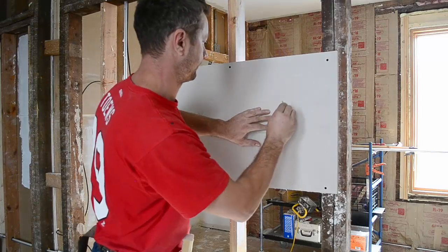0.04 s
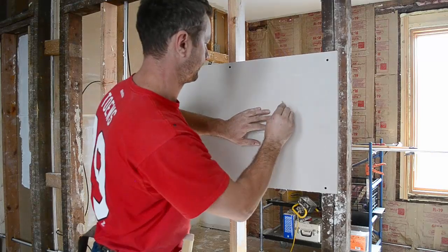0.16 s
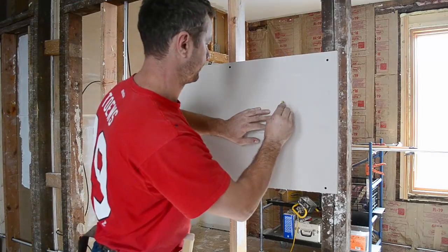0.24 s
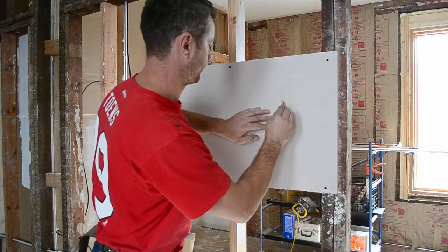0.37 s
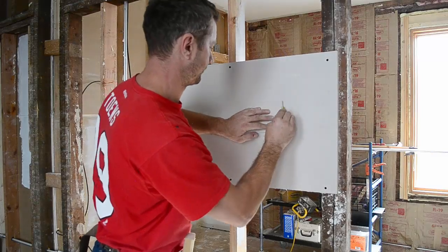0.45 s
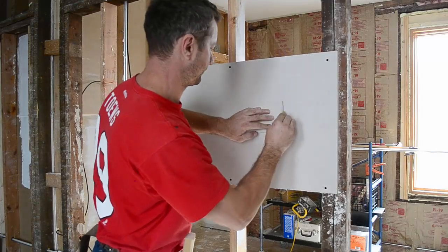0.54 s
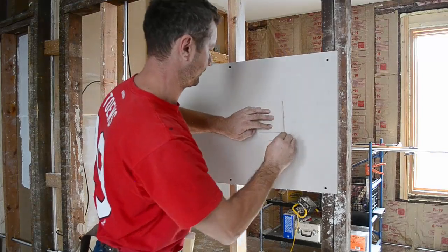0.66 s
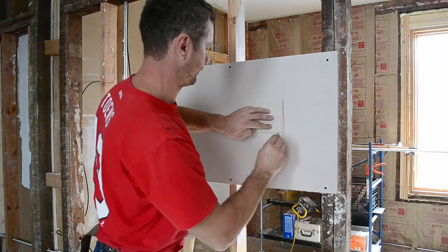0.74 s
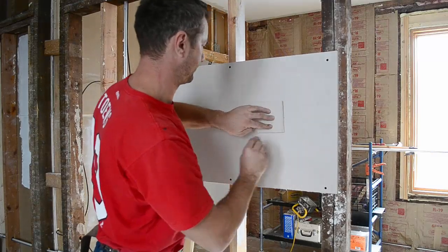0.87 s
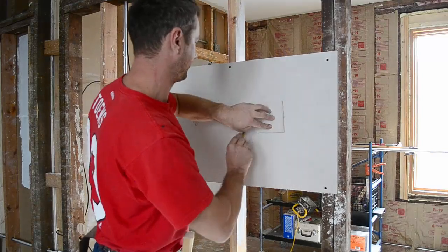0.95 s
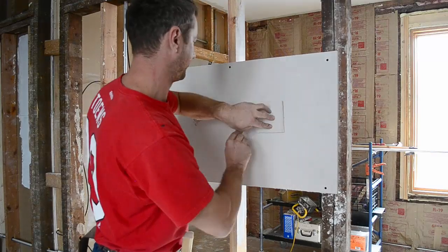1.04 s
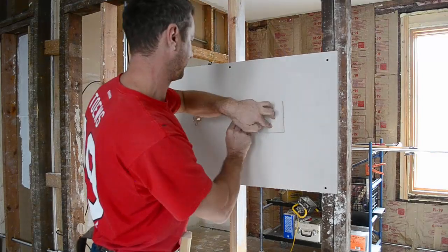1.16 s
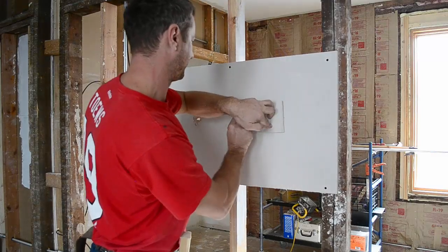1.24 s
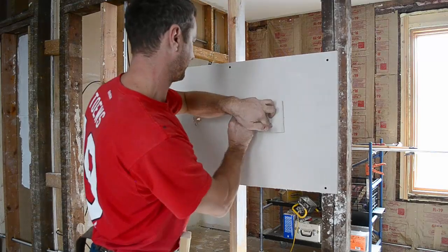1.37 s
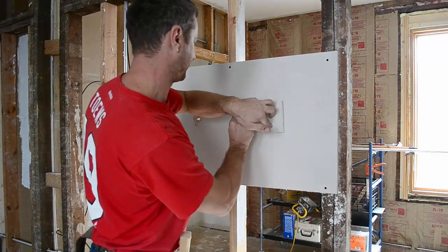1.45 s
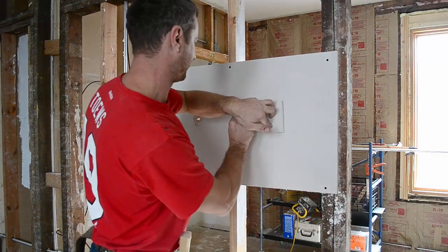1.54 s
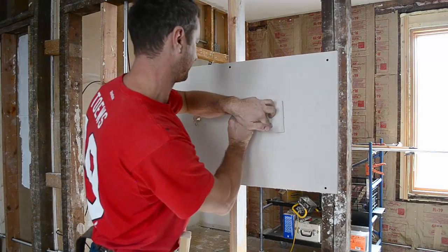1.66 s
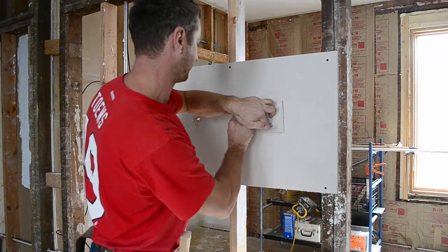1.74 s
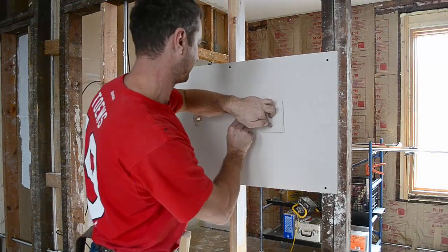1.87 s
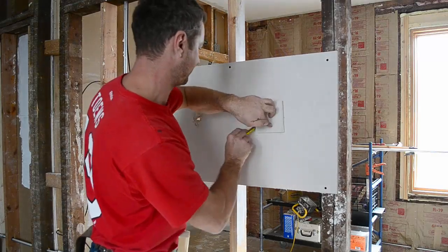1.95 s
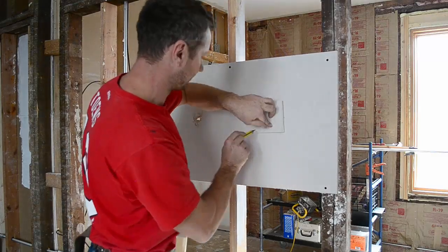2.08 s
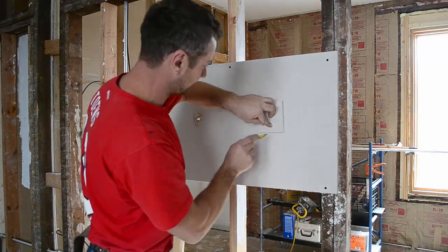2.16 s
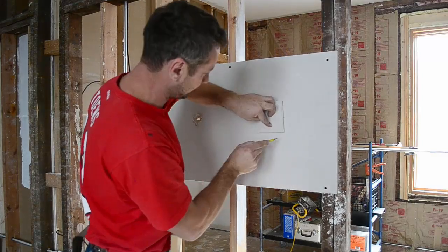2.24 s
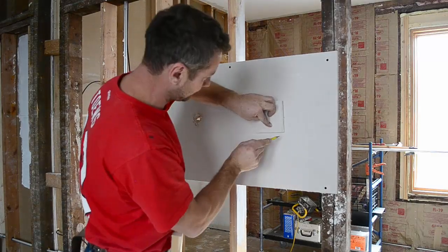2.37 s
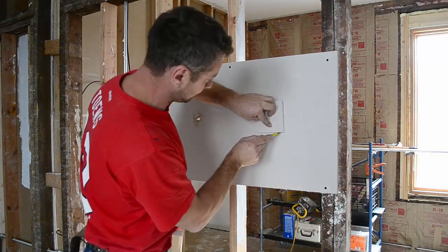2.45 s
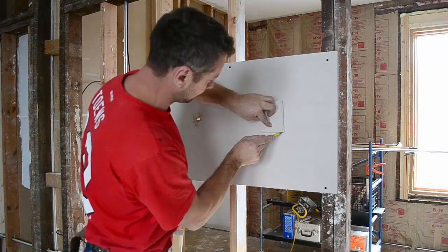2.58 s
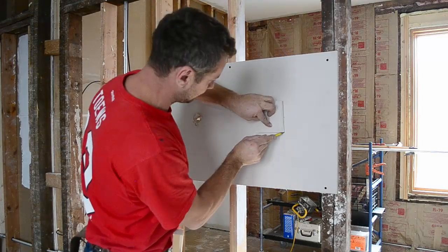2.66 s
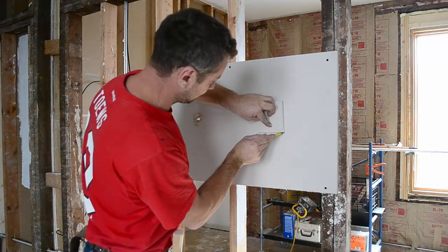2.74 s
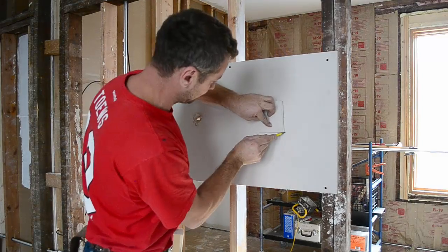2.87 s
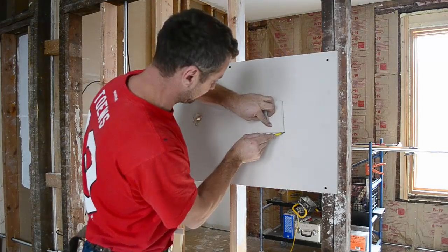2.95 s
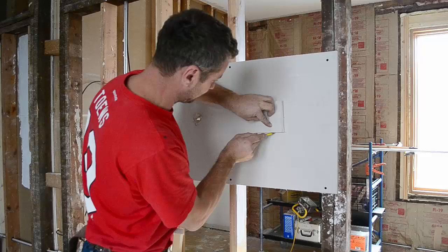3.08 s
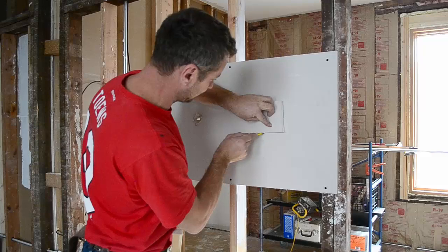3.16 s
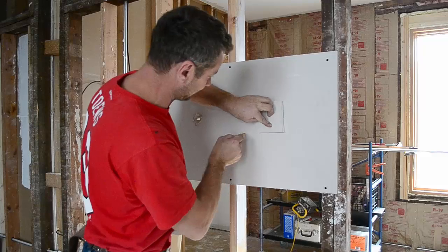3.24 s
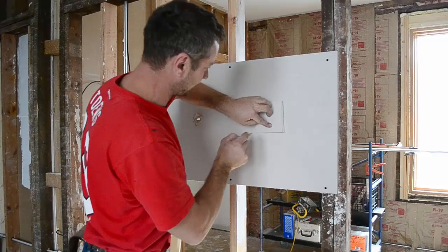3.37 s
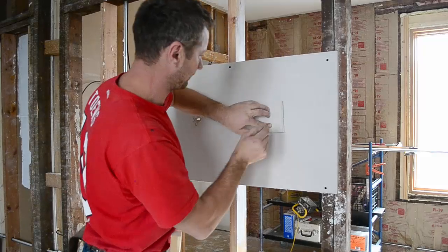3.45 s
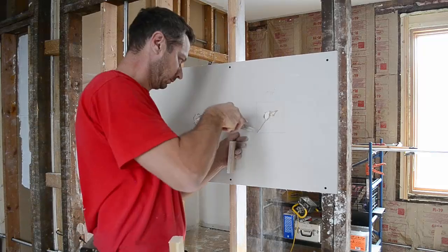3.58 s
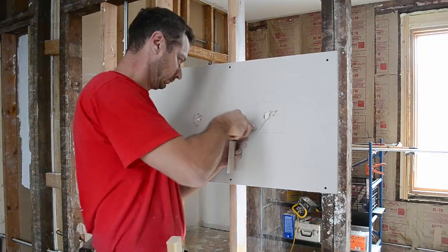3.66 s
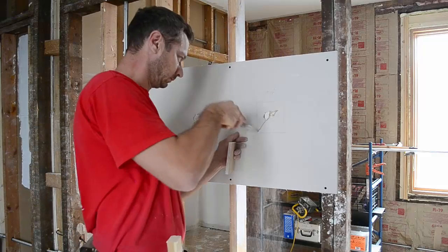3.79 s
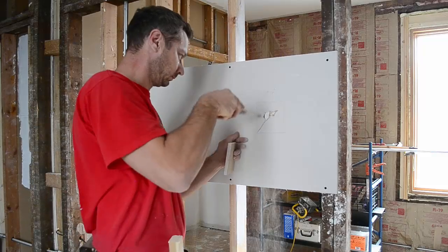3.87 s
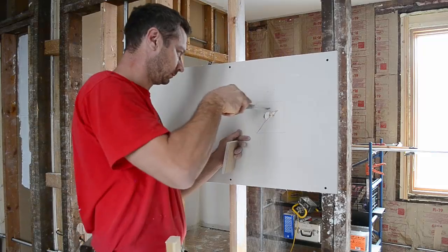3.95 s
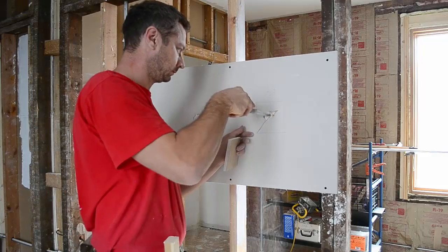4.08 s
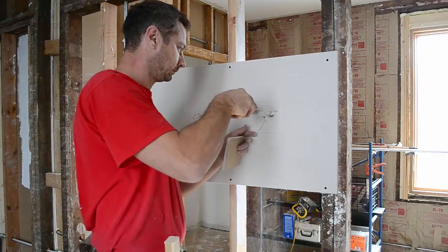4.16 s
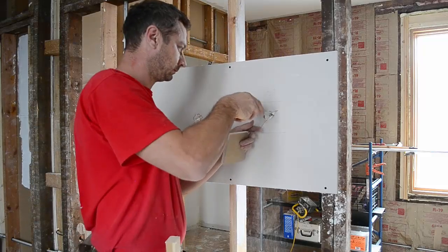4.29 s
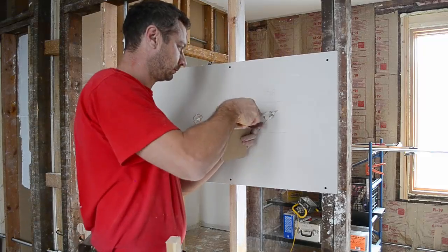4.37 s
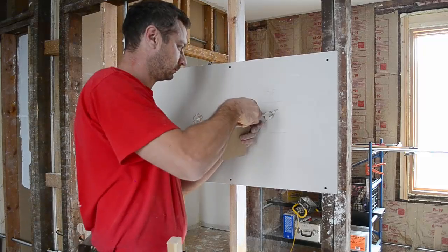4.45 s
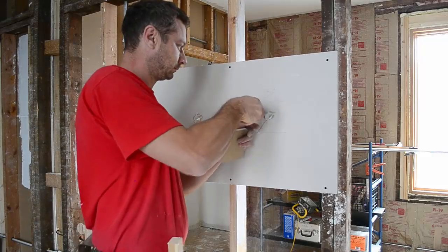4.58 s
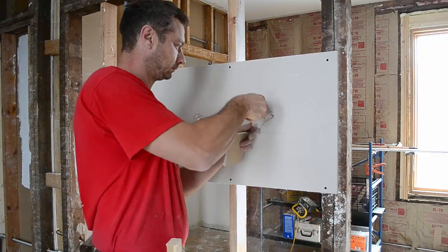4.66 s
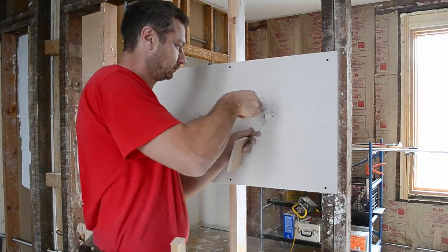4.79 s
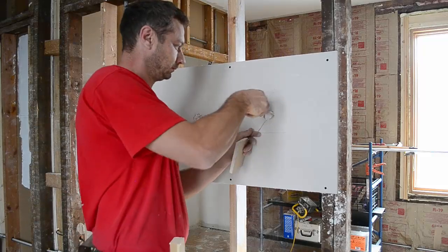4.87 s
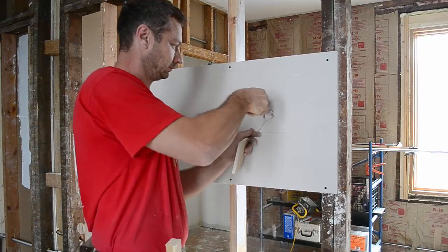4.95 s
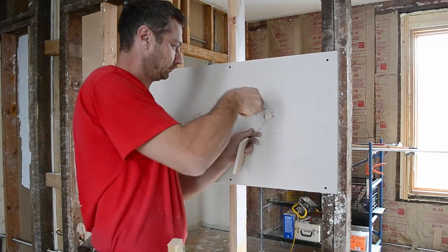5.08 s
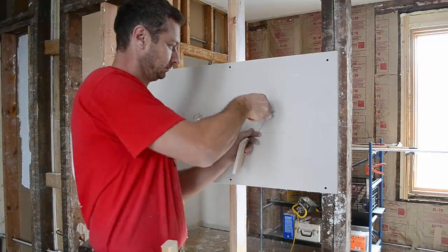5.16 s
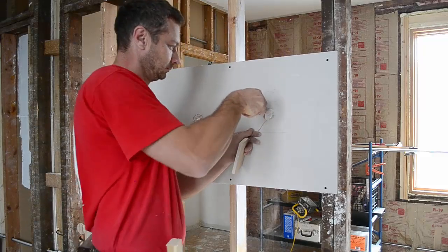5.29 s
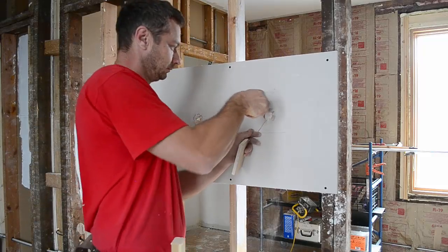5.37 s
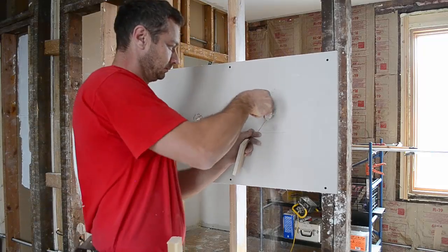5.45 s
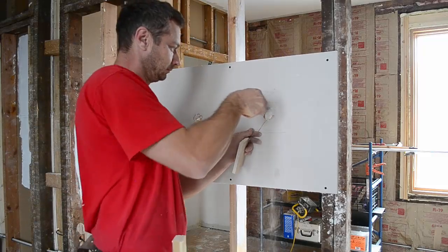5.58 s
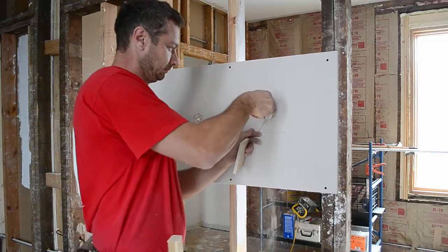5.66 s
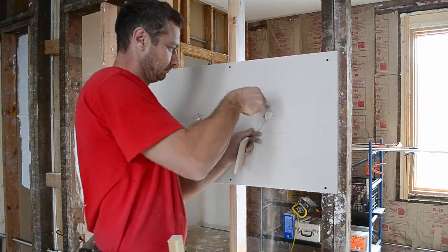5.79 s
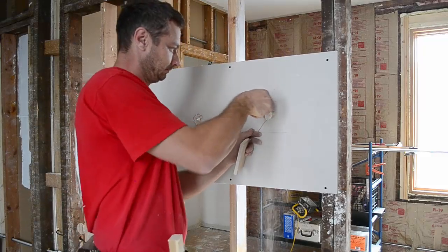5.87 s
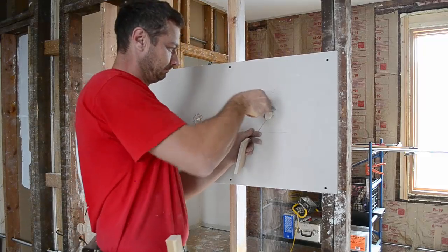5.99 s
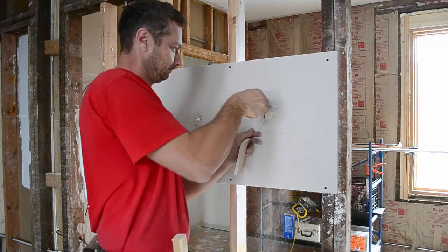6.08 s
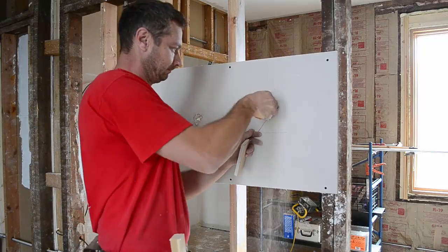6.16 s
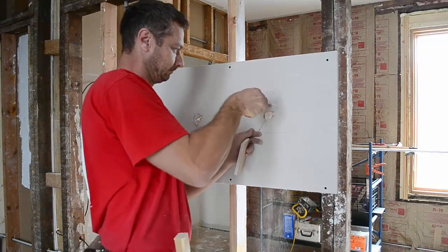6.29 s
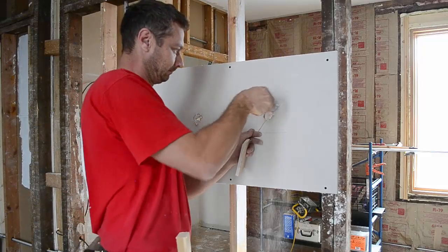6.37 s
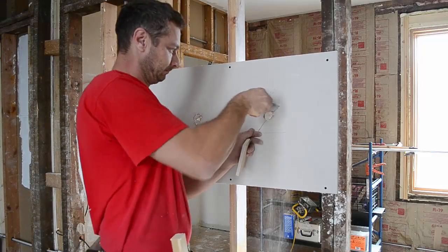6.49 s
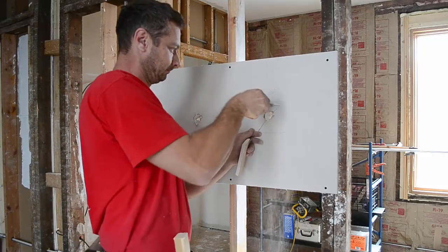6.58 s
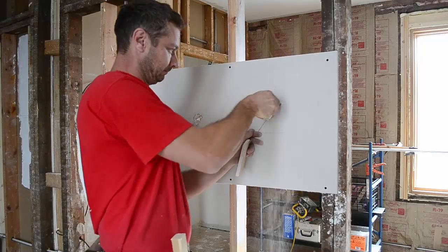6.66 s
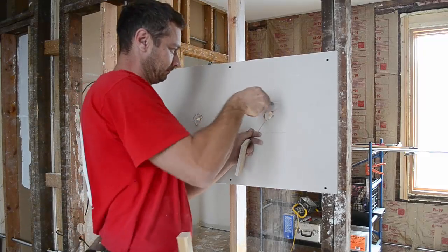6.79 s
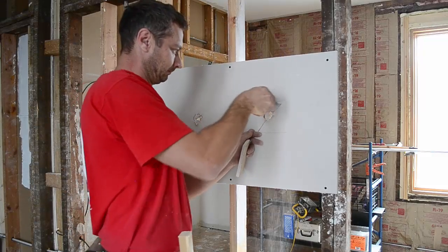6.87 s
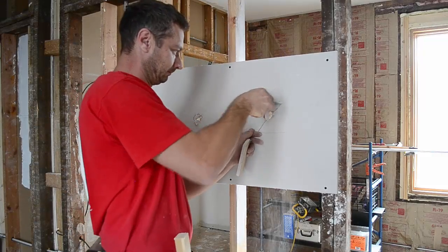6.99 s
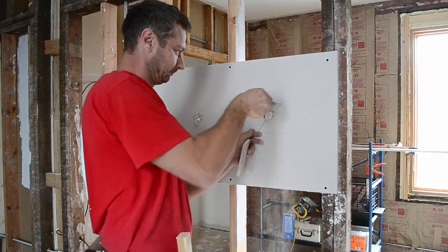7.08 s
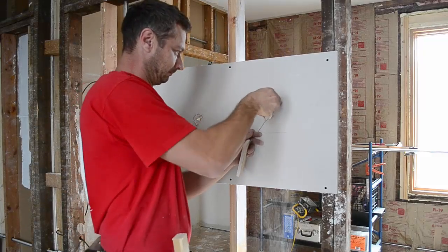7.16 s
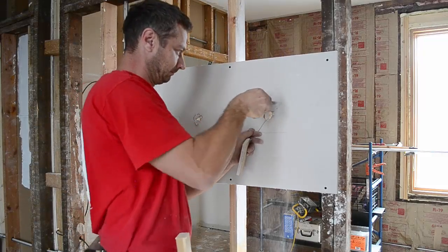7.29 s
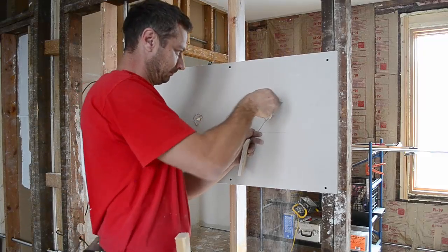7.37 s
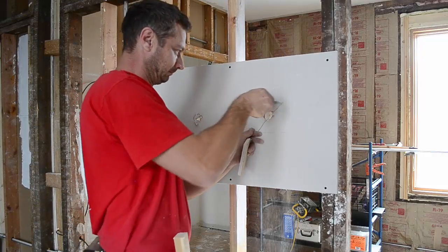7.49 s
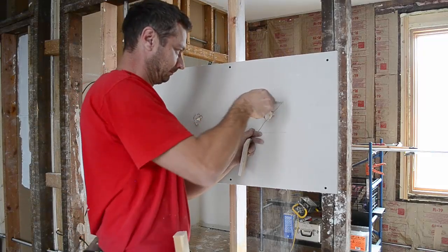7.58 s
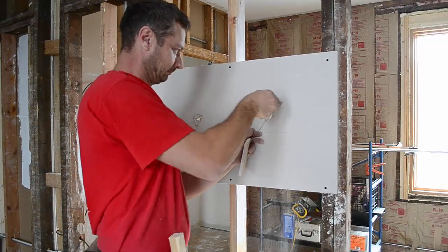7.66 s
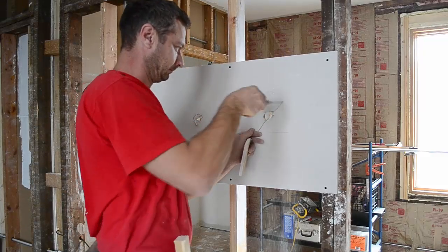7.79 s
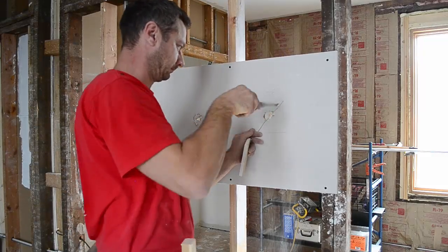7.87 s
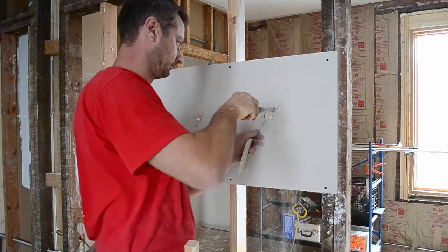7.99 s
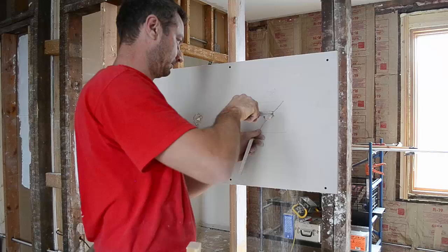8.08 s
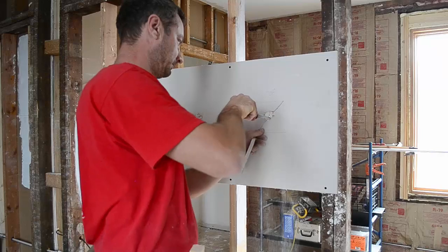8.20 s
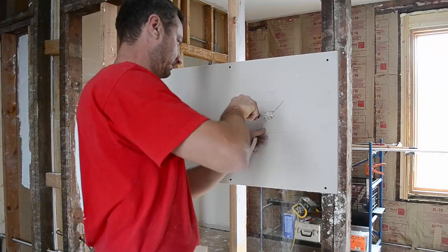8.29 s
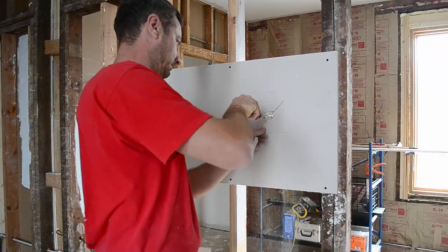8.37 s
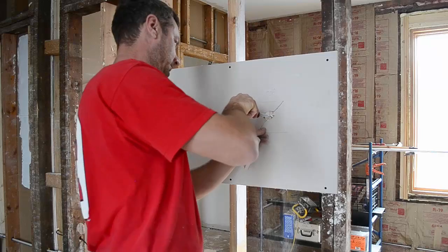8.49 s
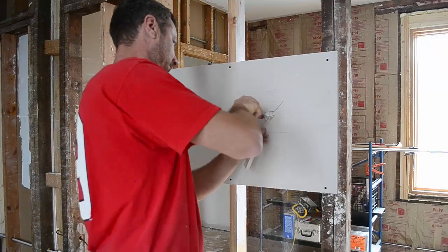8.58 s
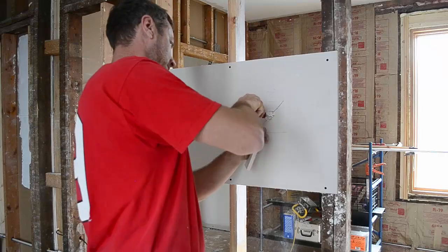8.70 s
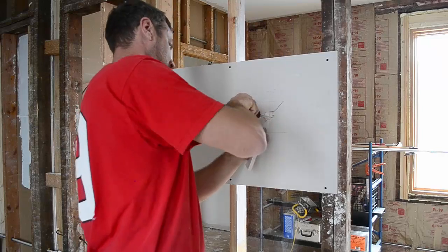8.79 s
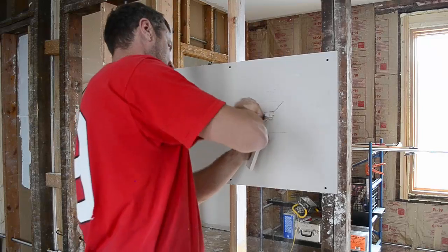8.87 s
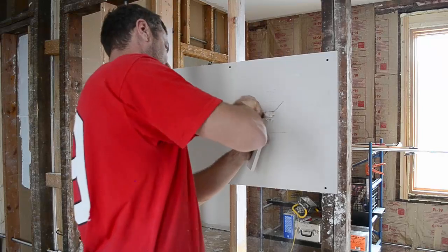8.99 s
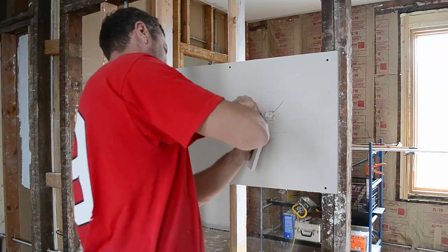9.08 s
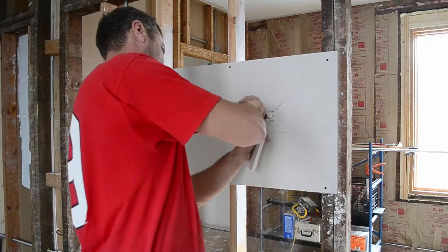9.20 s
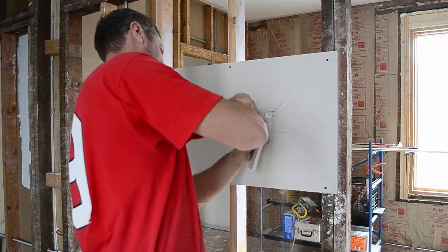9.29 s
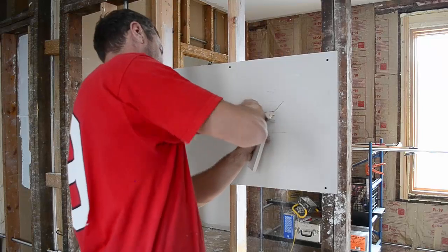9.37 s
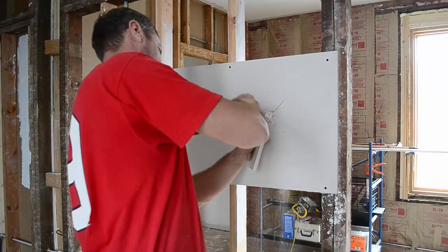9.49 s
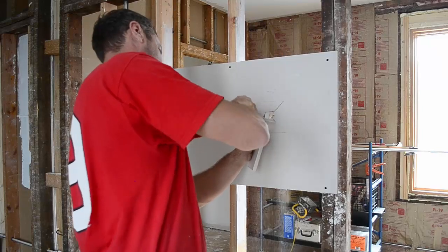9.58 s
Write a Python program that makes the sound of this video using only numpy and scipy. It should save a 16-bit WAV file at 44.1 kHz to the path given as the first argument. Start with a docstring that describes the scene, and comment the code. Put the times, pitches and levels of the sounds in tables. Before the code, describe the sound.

In a quiet, bare room, a pencil draws a few faint scratchy lines on drywall, with light knocks and plastic ticks. A hand saw is jabbed hard through the sheet, scrapes and snags, then rasps in quick push-pull strokes, about four cycles a second, with hollow thudding and gritty crunch. It pauses, slides softly, then starts a second cut. Close microphone, short room ring.

```python
"""A jab saw is punched through drywall, rasps back and forth, is drawn out, and starts a second cut.
Its teeth shake the sheet and crush the gypsum core: jolts and grains through sheet and blade resonances.
Before that a pencil traces three sides of an outlet box: grain noise shaped by pressure.
Box, pencil and saw handle knock, tick and squeak. The empty room adds a short ring and faint air noise.
"""
import sys
import numpy as np
from scipy import signal
from scipy.fft import rfft, irfft
from scipy.io import wavfile
from scipy.ndimage import uniform_filter1d

SR = 44100
rng = np.random.default_rng(int(sys.argv[2]) if len(sys.argv) > 2 else 0)


def output_pcm(signal):
    """Save a mono or channel-first signal as 16-bit PCM at the path in sys.argv[1].

    Samples are clipped to [-1, 1] before scaling.
    """
    pcm = np.clip(np.atleast_2d(signal).T, -1, 1) * 32767
    wavfile.write(sys.argv[1], SR, np.round(pcm).astype(np.int16))


N = 425124
TIME_S = np.arange(N) / SR

# Table levels are relative: filters, mix gains and the room follow.
# faint air of the room: freq_hz, spectrum_db
AIR_SPECTRUM = [(15, -57.5), (25, -38.5), (96, -3), (410, -6.5), (478, -2), (4260, -17.5), (6730, -22.5),
                (7460, -26.5), (8050, -31), (9620, -27.5), (10900, -41), (14200, -34), (22000, -120)]
AIR_DB = -63.5
# ring of the room: freq_hz, t60_s
ROOM_DECAY = [(150, 0.54), (400, 0.23), (1000, 0.44), (2800, 0.44), (7300, 0.42)]

# sheet between its studs: freq_hz, width_hz, lift_db
BOARD_MODES = [(159.6, 24.6, 9), (214, 15, 5.5), (357, 37, 9.5), (534, 101, 7), (859, 48, 6.5),
               (1023, 25, 4), (1042, 41, 2), (1110, 20, 6.5), (1309.5, 30, 9), (1754, 25, 6),
               (2273, 110, 3.5)]
# steel blade: freq_hz, width_hz, lift_db
BLADE_MODES = [(1880, 39, 7.5), (2510, 430, 0.5), (2740, 90, 1.5), (2950, 100, 0)]
# plastic box: freq_hz, width_hz, lift_db
BOX_MODES = [(2046, 200, 13), (2290, 200, 13), (2950, 220, 8), (4950, 450, 8)]
# box pressed against the pencil: freq_hz, width_hz, lift_db
PENCIL_MODES = [(494, 45, 2), (870, 350, 5.5), (3060, 220, 3.5), (4900, 350, 6.5)]

# sheet shaken by the teeth: freq_hz, spectrum_db
THUD_SPECTRUM = [(25, -50.5), (62, -33.5), (95, -8), (150, -2), (300, 0.5), (480, -2.5), (650, -4.5),
                 (1000, -9.5), (2000, -31.5), (6000, -42.5)]
# teeth on the paper face: freq_hz, spectrum_db
RASP_SPECTRUM = [(100, -50.5), (400, -11), (750, 4), (1100, 0.5), (1500, -2.5), (2500, -11.5), (5000, -37),
                 (10000, -52)]
# crushed gypsum: freq_hz, spectrum_db
CRUNCH_SPECTRUM = [(100, -21.5), (600, -9), (1400, -4.5), (2000, 1.5), (3000, -0.5), (4000, -4.5),
                   (5000, -10.5), (6500, -15.5), (7400, -18), (7900, -24.5), (9000, -18), (10200, -30.5)]
# blade sliding over grit: freq_hz, spectrum_db
SCRAPE_SPECTRUM = [(20, -38), (100, -6), (250, -0.5), (700, 1), (1400, -1), (2400, 0), (4000, -2),
                   (6500, -9), (8000, -14), (9200, -12), (10500, -23)]
# pencil on paper: freq_hz, spectrum_db
GRAPHITE_SPECTRUM = [(60, -32), (150, -11), (350, -5.5), (600, -5.5), (1000, -4), (1500, -3.5),
                     (2200, -7.5), (3000, -10), (4200, -16.5), (5400, -14.5), (7800, -24), (9300, -22),
                     (10500, -34)]
# dull touch: freq_hz, spectrum_db
KNOCK_SPECTRUM = [(20, -45), (200, -3), (600, 5.5), (1100, -2), (2000, -11), (5000, -21), (10000, -45)]
# sharp touch: freq_hz, spectrum_db
TICK_SPECTRUM = [(20, -60), (200, -11), (1500, -5), (2100, -1), (4000, -6), (7000, -7), (10000, -20)]

# box, pencil and saw handle knocking on the board: start_s, level_db
KNOCKS = [(.159, -56), (.189, -47), (.273, -47), (.308, -49), (1.148, -56), (1.389, -51), (1.444, -46),
          (1.737, -47.5), (2.472, -49), (2.98, -44), (4.452, -34.5)]
# ticks and creaks of the box and the saw in the hand: start_s, level_db
TICKS = [(1.274, -43.5), (1.316, -57), (1.4, -54), (2.249, -59), (8.053, -54)]
KNOCK_DECAY_S, TICK_DECAY_S = 0.025, 0.021

# box or blade shifted: start_s, length_s, pitch_hz, overtone_hz, level_db
SQUEAKS = [(1.367, 0.054, 2850, 4700, -54.5), (2.292, .06, 3000, 6000, -64),
           (4.027, 0.066, 2550, 3650, -45.5), (8.032, .05, 2800, 4000, -49)]
SQUEAK_ATTACK_S, SQUEAK_RELEASE_S, SQUEAK_WIDTH_HZ, OVERTONE_DB = 0.03, 0.03, 500, -7.5

# pencil lines and short touches on the paper face: start_s, length_s, level_db, swell_db (start to end)
PENCIL_LINES = [(.4, .325, -36, 3.5), (1.605, 0.076, -48, -4), (1.74, 0.34, -34.5, 2.5),
                (2.475, 0.12, -44, -1), (2.715, 0.057, -48, 6), (2.83, 0.14, -49, 1),
                (2.98, 0.31, -32.5, 19)]
PENCIL_ATTACK_S, PENCIL_RELEASE_S = 0.044, 0.023

# blade sliding lightly in the slot: start_s, length_s, level_db, swell_db (start to end)
SLIDES = [(3.925, .08, -50.5, -9), (4.02, .13, -54.5, -8), (4.18, .14, -36.5, 6), (4.3, 0.31, -42, -3.5),
          (8.01, 0.21, -57.5, -4), (8.235, 0.086, -55, -3), (8.31, 0.17, -46, -7),
          (8.455, 0.098, -54.5, -1)]
SLIDE_ATTACK_S, SLIDE_RELEASE_S = 0.029, 0.023

# blade singing at a pitch set by how the slot holds it: start_s, end_s, pitch_hz, width_hz, gain_db
SINGING = [(4.15, 4.383, 3300, 165, 7.5), (8.5, 9.7, 3510, 80, 3.5)]

# push and pull, effort against a typical push: start_s, push_effort_db, pull_effort_db
STROKES = [(4.556, 0, -8.5), (4.815, 0.5, -5), (5.087, 2, -1.5), (5.338, -0.7, -3), (5.587, -0.5, -2.5),
           (5.833, 1, -2), (6.081, 0.5, -3), (6.343, -2.5, -3), (6.584, 1.5, -1.5), (6.838, -4, -4),
           (7.077, 0.6, -4), (7.322, -1.5, -5), (7.569, -3.5, -8), (8.558, -2.5, -8), (8.832, 0, -6.5),
           (9.083, 1, -5.5), (9.327, 2, -5.5), (9.578, 3, -10)]
# shove that drives the blade through, and its follow-through: start_s, length_s, effort_db
PLUNGE = [(3.609, .127, -1), (3.693, .148, -12.5)]
# saw tip jabbed into the board: start_s, effort_db, decay_s
JABS = [(3.537, -3.5, 0.068), (3.565, -4.5, 0.0078), (4.556, -18.5, .033), (8.538, -12.5, 0.036)]
# single teeth snagging as the blade is fed into the slot: start_s, level_db
SNAGS = [(4.183, -29), (4.257, -31), (4.278, -28), (4.292, -30), (4.345, -32), (4.381, -28), (4.49, -27.5)]
SNAG_DECAY_S = 0.0065
# slow drift of the contact levels along the cut: time_s, thud_db, rasp_db, crunch_db
DRIFT = [(3.6, 0.5, 0.5, -1.5), (4.6, .5, -1, 4), (5.3, .5, -4, 0.1), (6.1, .5, .5, 1.4), (7.3, 1, 1, -2),
         (8.55, -2, 3.5, 2.5), (8.8, 0.5, 1.5, -.5), (9.6, 0.5, 1.5, -1)]

# the pull starts at PULL_SHARE of a cycle; a cycle is capped at SLOWEST_S
PUSH_S, PULL_S, PULL_SHARE, SLOWEST_S = 0.146, 0.134, 0.552, 0.275
# contact levels on a typical push, and dB gained per dB of effort
THUD_DB, RASP_DB, CRUNCH_DB = -14.5, -20.5, -22
RASP_PER_EFFORT, CRUNCH_PER_EFFORT = 1, 0.67
# until the slot opens, pushed teeth bind: they shake the sheet but cut little
SLOT_OPEN_S, BIND_DB = 4.95, -11


def from_db(db):
    """Decibels to gain."""
    return 10 ** (np.asarray(db) / 20)


def unit(x):
    """Scales to rms 1."""
    return x / np.sqrt(np.mean(x ** 2) + 1e-20)


def read(points, hz):
    """Reads a table along a log-frequency axis."""
    table_hz, value = np.transpose(points)
    return np.interp(np.log(hz + 1), np.log(table_hz + 1), value)


def colour(x, spectrum, modes=(), size=8192):
    """Minimum-phase filter of energy 1: a broad spectrum lifted by ringing resonances."""
    hz = np.fft.rfftfreq(size, 1 / SR)
    db = read(spectrum, hz)
    for mode_hz, width_hz, lift_db in modes:
        db = db + lift_db / (1 + (2 * (hz - mode_hz) / width_hz) ** 2)
    # folding the cepstrum makes the response causal
    cepstrum = irfft(np.log(from_db(db)))
    cepstrum[1:size // 2] *= 2
    cepstrum[size // 2 + 1:] = 0
    ring = irfft(np.exp(rfft(cepstrum)))[:size // 2]
    return signal.oaconvolve(x, ring / np.linalg.norm(ring))[:N]


def grains(per_s, spread_db):
    """Tiny fractures at random moments, a few much larger than the rest; rms 1."""
    sizes = from_db(spread_db * np.minimum(rng.exponential(1, N), 4))
    signs = rng.choice([-1, 1], N)
    return unit(sizes * signs * (rng.random(N) < per_s / SR))


def flutter(per_s, depth_db):
    """Unevenness: a gain of rms 1 that wanders at the given rate."""
    knots = rng.standard_normal(N)
    return unit(from_db(depth_db * np.interp(TIME_S * per_s, np.arange(N), knots)))


def blow(start_s, level_db, decay_s):
    """Gain that jumps at a blow and dies away exponentially."""
    return from_db(level_db) * (TIME_S >= start_s) * np.exp(-abs(TIME_S - start_s) / decay_s)


def rubs(rows, attack_s, release_s):
    """Gain of rubbing moves: each sets in, swells or eases evenly in dB, and lifts off."""
    gain = np.zeros(N)
    for start_s, length_s, level_db, swell_db in rows:
        moving = (TIME_S > start_s) & (TIME_S < start_s + length_s)
        age_s = TIME_S[moving] - start_s
        touch = np.minimum(age_s / attack_s, 1) * np.minimum((length_s - age_s) / release_s, 1)
        gain[moving] += touch * from_db(level_db + swell_db * (age_s / length_s - 0.5))
    return gain


def contacts(rows, decay_s, click_db=14):
    """Each touch starts with a click and ends in a brief scuff."""
    scuff_gain = sum(blow(start_s, level_db, decay_s) for start_s, level_db in rows)
    force = scuff_gain * grains(5000, 2.7)
    for start_s, level_db in rows:
        force[int(start_s * SR)] += from_db(level_db + click_db)
    return force


def air():
    """Faint steady noise of the quiet room."""
    return from_db(AIR_DB) * colour(rng.standard_normal(N), AIR_SPECTRUM)


def room(x, tail_db=-4, early_db=-3, early_cut_hz=800, tail_cut_hz=260):
    """Direct sound, a few hard stud reflections, then a tail whose bands die at their own speeds."""
    tap_s = TIME_S[:SR * 3 // 4]
    signs = rng.choice([-1., 1.], len(tap_s))
    taps = signs * (rng.random(len(tap_s)) < 3000 / SR) * (tap_s > 0.008)
    hz, age_s, bands = signal.stft(taps, SR, nperseg=256)
    decay = from_db(-60 * age_s / read(ROOM_DECAY, hz)[:, None])
    tail = signal.istft(bands * decay, SR, nperseg=256)[1]
    early = np.zeros(len(tail))
    delays_s = rng.uniform(0.002, 0.014, size=8)
    early[(delays_s * SR).astype(int)] = rng.choice([-1., 1.], size=8)
    # narrow timbers throw back little bass, and the open walls let it escape
    early = signal.sosfilt(signal.butter(2, early_cut_hz, "high", fs=SR, output="sos"), early)
    tail = signal.sosfilt(signal.butter(1, tail_cut_hz, "high", fs=SR, output="sos"), tail)
    echo = from_db(tail_db) * tail / np.linalg.norm(tail)
    echo += from_db(early_db) * early / np.linalg.norm(early)
    echo[0] += 1  # direct sound
    return signal.oaconvolve(x, echo / np.linalg.norm(echo))[:N]


def handling():
    """Dull touches sound the board, sharp ones the box."""
    knocks = colour(contacts(KNOCKS, KNOCK_DECAY_S), KNOCK_SPECTRUM, BOARD_MODES)
    ticks = colour(contacts(TICKS, TICK_DECAY_S), TICK_SPECTRUM, BOX_MODES)
    return knocks + ticks


def squeak_band(slips, centre_hz):
    """Slip noise in one resonance, rms 1."""
    edges_hz = [centre_hz - SQUEAK_WIDTH_HZ / 2, centre_hz + SQUEAK_WIDTH_HZ / 2]
    return unit(signal.sosfilt(signal.butter(2, edges_hz, "band", fs=SR, output="sos"), slips))


def squeaks():
    """Quick uneven slips ring a resonance and its overtone."""
    slips = grains(3200, 4.7)
    out = np.zeros(N)
    for start_s, length_s, pitch_hz, overtone_hz, level_db in SQUEAKS:
        gain = rubs([(start_s, length_s, level_db, 0)], SQUEAK_ATTACK_S, SQUEAK_RELEASE_S)
        overtone = from_db(OVERTONE_DB) * squeak_band(slips, overtone_hz)
        out += gain * (squeak_band(slips, pitch_hz) + overtone)
    return out


def pencil():
    """Graphite skips over paper fibres, and the sheet radiates it."""
    pressure = rubs(PENCIL_LINES, PENCIL_ATTACK_S, PENCIL_RELEASE_S)
    skips = pressure * grains(7000, 3.2) * flutter(120, 2.2)
    return from_db(-3) * colour(skips, GRAPHITE_SPECTRUM, BOARD_MODES + PENCIL_MODES)


def sliding_blade():
    """The unloaded blade drags over loose grit."""
    grit = grains(4000, 4.5) * flutter(90, 2.5)
    return colour(rubs(SLIDES, SLIDE_ATTACK_S, SLIDE_RELEASE_S) * grit, SCRAPE_SPECTRUM, BLADE_MODES)


def singing_blade(cutting):
    """The grit under the teeth sets one bending mode of the blade ringing."""
    ring = np.zeros(N)
    for start_s, end_s, pitch_hz, width_hz, gain_db in SINGING:
        held = (TIME_S > start_s) & (TIME_S < end_s)
        peak = signal.iirpeak(pitch_hz, pitch_hz / width_hz, SR)
        ring += from_db(gain_db) * signal.lfilter(*peak, cutting * held)
    return ring


def strokes():
    """Plunge moves, then pushes and pulls in turn: start_s, length_s, effort_db, bind_db."""
    moves = [(start_s, length_s, effort_db, 0) for start_s, length_s, effort_db in PLUNGE]
    starts_s = np.transpose(STROKES)[0]
    cycles_s = np.minimum(np.diff(starts_s, append=np.inf), SLOWEST_S)
    for (start_s, push_db, pull_db), cycle_s in zip(STROKES, cycles_s):
        moves.append((start_s, PUSH_S, push_db, BIND_DB * (start_s < SLOT_OPEN_S)))
        moves.append((start_s + PULL_SHARE * cycle_s, PULL_S, pull_db, 0))
    return moves


def swing(progress):
    """Blade speed, 0-1, from the start of a stroke to its end."""
    return abs(np.sin(np.pi * progress))


def stroke_gains(thud_lead=0.87, thud_power=2.04, rasp_power=1.8, crunch_power=1.045):
    """Blade speed and the thud, rasp and crunch gains, rising and falling with each stroke."""
    speed, thud, rasp, crunch = np.zeros((4, N))
    drift_s, thud_drift_db, rasp_drift_db, crunch_drift_db = np.transpose(DRIFT)
    for start_s, length_s, effort_db, bind_db in strokes():
        moving = (TIME_S > start_s) & (TIME_S < start_s + length_s)
        progress = (TIME_S[moving] - start_s) / length_s
        speed[moving] = np.maximum(speed[moving], swing(progress))
        thud_db = THUD_DB + effort_db + np.interp(start_s, drift_s, thud_drift_db)
        rasp_db = RASP_DB + RASP_PER_EFFORT * effort_db + bind_db
        rasp_db += np.interp(start_s, drift_s, rasp_drift_db)
        crunch_db = CRUNCH_DB + CRUNCH_PER_EFFORT * effort_db + bind_db
        crunch_db += np.interp(start_s, drift_s, crunch_drift_db)
        # the thud peaks a little before mid-stroke, as the teeth dig in
        thud[moving] += from_db(thud_db) * swing(progress ** thud_lead) ** thud_power
        rasp[moving] += from_db(rasp_db) * swing(progress) ** rasp_power
        crunch[moving] += from_db(crunch_db) * swing(progress) ** crunch_power
    return speed, thud, rasp, crunch


def teeth(speed, peak_per_s=330, spread_db=1.0):
    """One jolt each time a tooth catches; the rate follows the blade, with uneven slips."""
    rate_per_s = peak_per_s * (0.25 + 0.75 * speed) * flutter(400, 4)
    caught = np.diff(np.floor(np.cumsum(rate_per_s) / SR), prepend=0)
    jolts = caught * from_db(spread_db * np.clip(rng.standard_normal(N), -2, 2))
    # the arm keeps a steady force: divide by the local rms
    return jolts / np.sqrt(abs(uniform_filter1d(jolts ** 2, size=2600)) + 1e-9)


def crumbling(jolts, crumble_s=0.0021, bite_share=0.16):
    """Grain gain: each jolt adds a burst of power that dies away over a steady part."""
    keep = np.exp(-2 / (crumble_s * SR))  # power decays twice as fast as amplitude
    bursts = signal.lfilter([1 - keep], [1, -keep], jolts ** 2)
    return np.sqrt(1 - bite_share + bite_share * bursts)


def saw():
    """Teeth jolt the sheet, and each jolt sheds a burst of paper and gypsum grains."""
    speed, thud, rasp, crunch = stroke_gains()
    for start_s, effort_db, decay_s in JABS:
        thud += blow(start_s, THUD_DB + effort_db, decay_s)
        crunch += blow(start_s, CRUNCH_DB + CRUNCH_PER_EFFORT * effort_db, decay_s)
    for start_s, level_db in SNAGS:
        crunch += blow(start_s, level_db, SNAG_DECAY_S)
    jolts = teeth(speed)
    crumble = crumbling(jolts)
    shaking = thud * (0.84 * jolts + 0.5 * grains(2500, 4.8))
    tearing = rasp * crumble * grains(2500, 2.9)
    crushing = crunch * crumble * grains(6000, 2.44)
    sheet = from_db(1) * colour(shaking, THUD_SPECTRUM, BOARD_MODES)
    paper = from_db(0.5) * colour(tearing, RASP_SPECTRUM, BOARD_MODES)
    gypsum = from_db(0.17) * colour(crushing, CRUNCH_SPECTRUM, BOARD_MODES + BLADE_MODES)
    return sheet + paper + gypsum


def scene():
    """Saw, pencil and handling in the room, over its faint air."""
    cutting = saw() + sliding_blade()
    sources = cutting + singing_blade(cutting) + pencil() + handling() + squeaks()
    return (room(sources) + air())[None]


def record(dry, edge_hz=10750):
    """Rounds off the tallest peaks and limits the band."""
    rounded = np.tanh(dry * 0.8) / 0.8
    lowpass = signal.firwin(161, edge_hz, window=("kaiser", 7), fs=SR)
    return signal.oaconvolve(rounded, lowpass[None], "same")


dry = scene()
out = record(dry)
output_pcm(out)
```